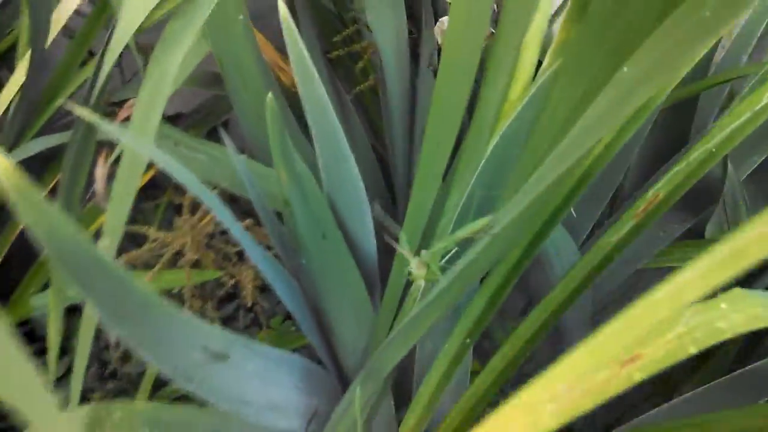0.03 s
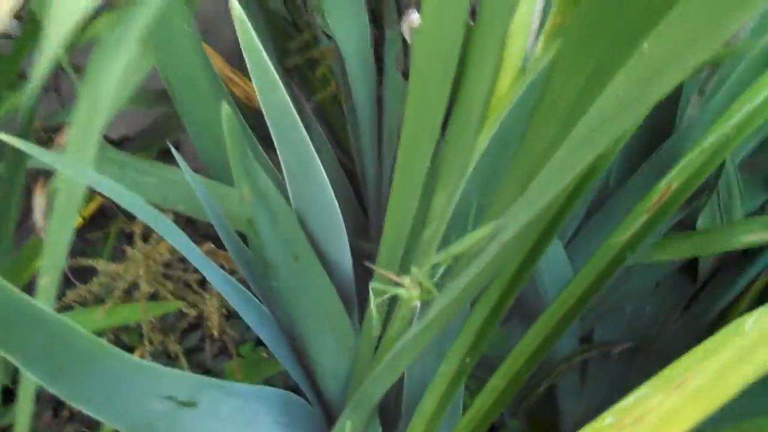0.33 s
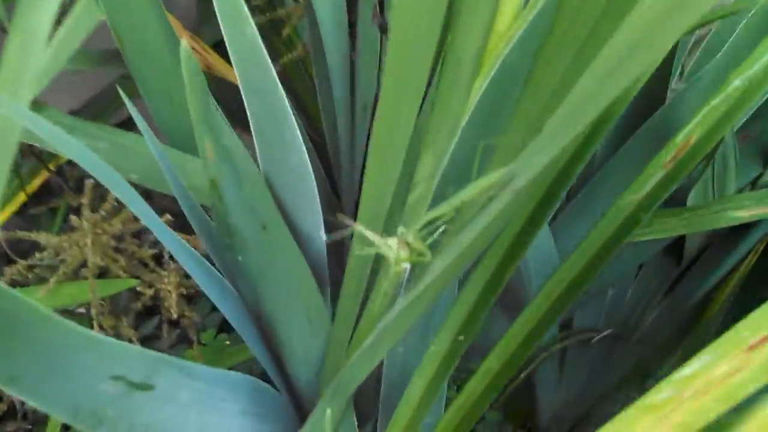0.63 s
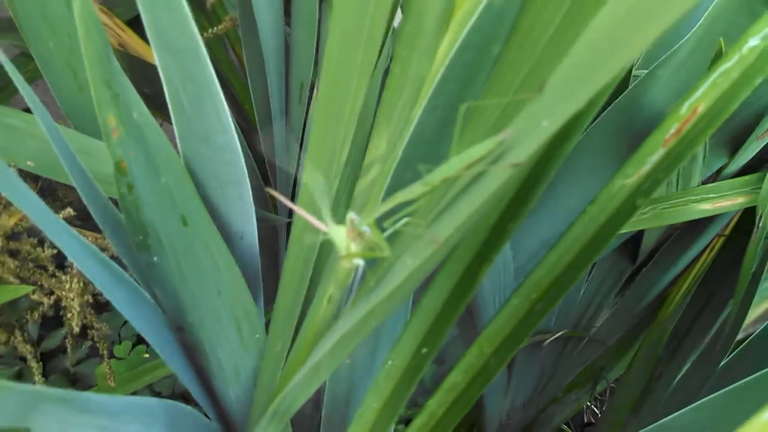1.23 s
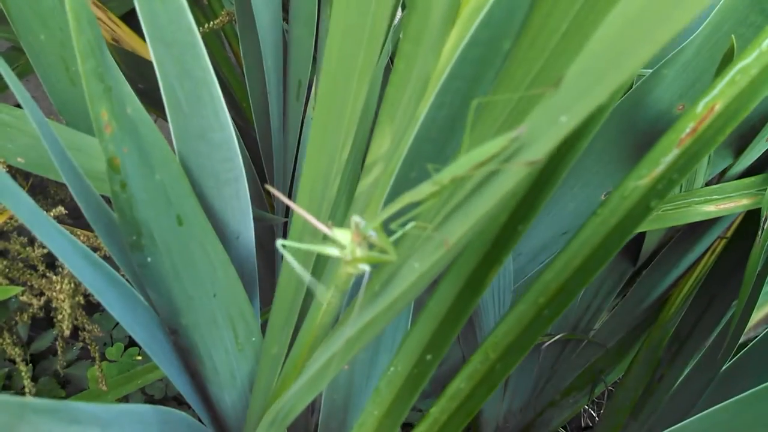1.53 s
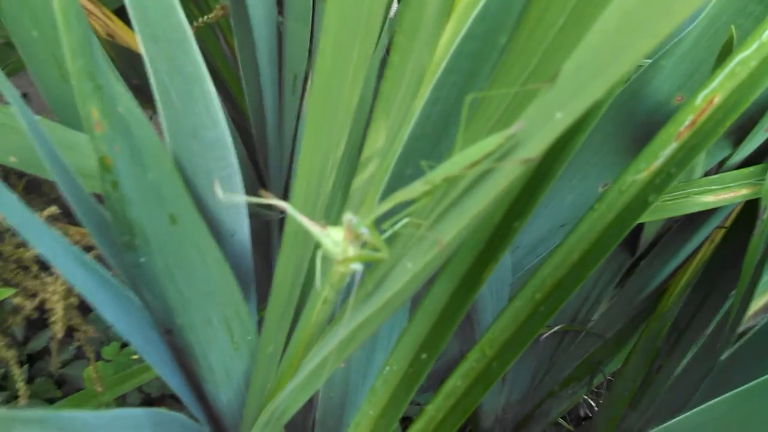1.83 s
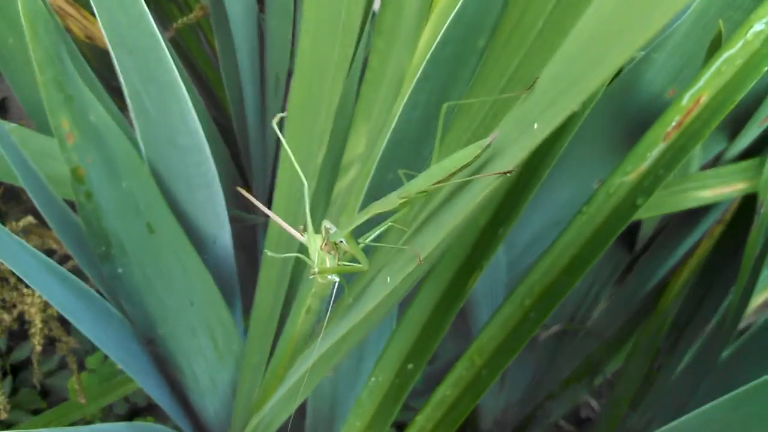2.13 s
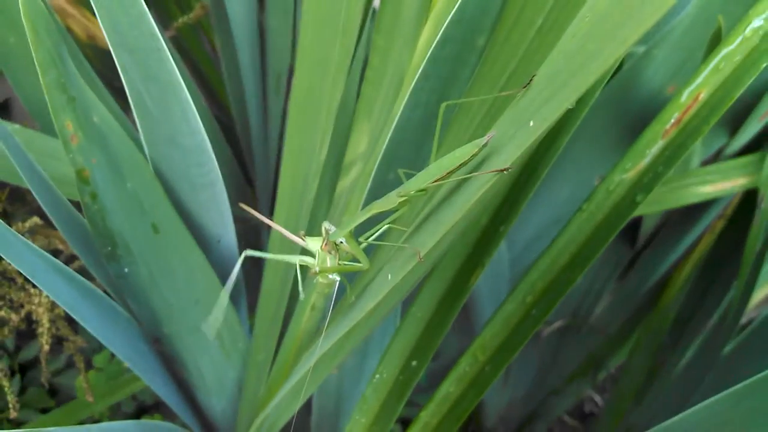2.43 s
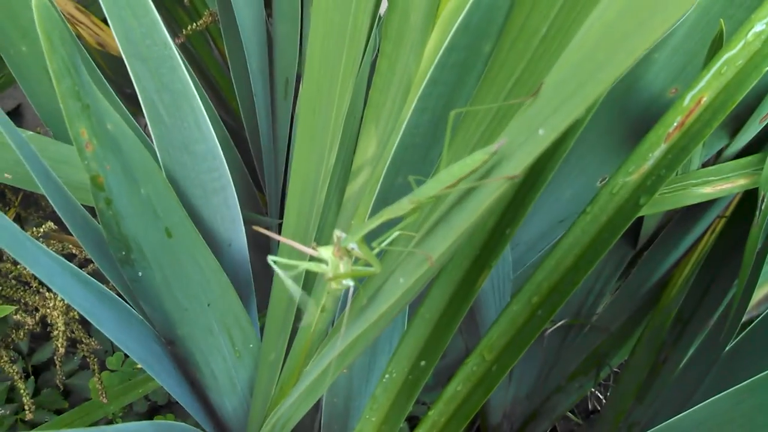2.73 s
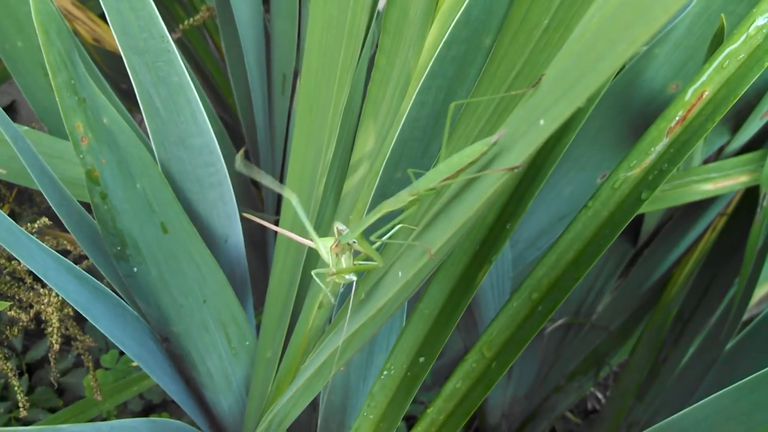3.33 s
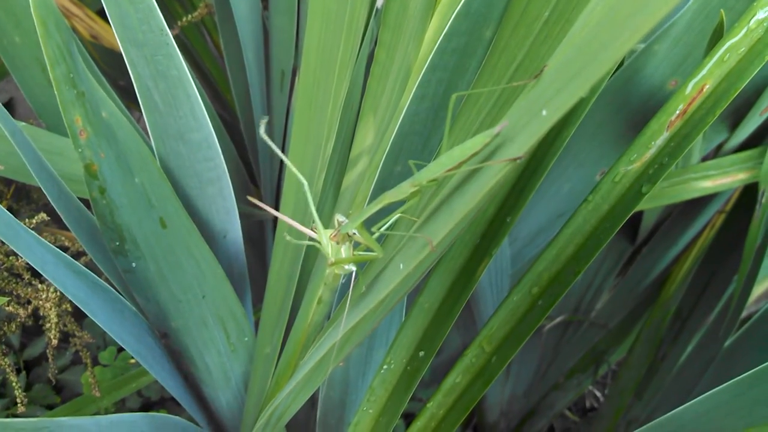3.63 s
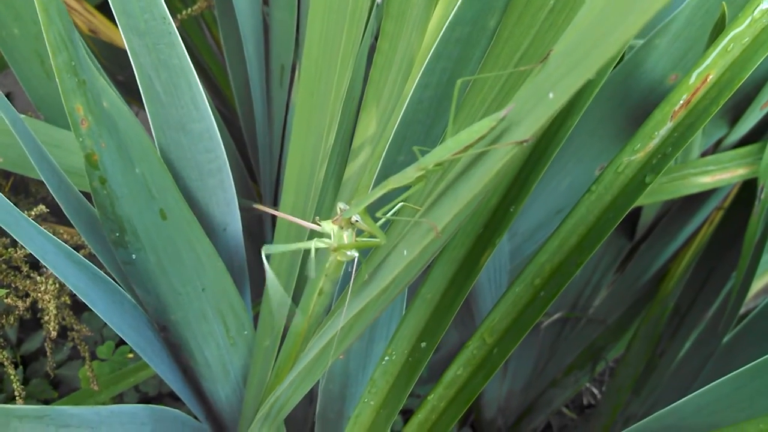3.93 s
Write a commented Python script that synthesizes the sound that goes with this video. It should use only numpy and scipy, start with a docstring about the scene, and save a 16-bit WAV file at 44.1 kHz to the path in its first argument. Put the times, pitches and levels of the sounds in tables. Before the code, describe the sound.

Low, steady outdoor rumble and hiss, broken by fingers rubbing the microphone and dry ticks.

```python
"""A quiet garden, heard from a hand-held recorder close to a leafy plant.
Distant traffic and a machine hum lie under thin bands of far insects and microphone hiss.
Fingers rub over the case twice and bump it once. The handling and the leaves give small ticks
and a few dry snaps, each a tiny knock that rings briefly. Later come four faint, high pips."""
import sys
import numpy as np
from scipy import signal
from scipy.fft import rfft, irfft
from scipy.io import wavfile

SR = 44100
rng = np.random.default_rng(int(sys.argv[2]) if len(sys.argv) > 2 else 0)


def inscribe(sig):
    """Save sig as 16-bit PCM at rate SR to the path in sys.argv[1].

    A 1-D sig is mono; a 2-D sig holds one channel per row.
    Samples are clipped to [-1, 1] before scaling.
    """
    pcm = np.round(np.clip(np.atleast_2d(sig).T, -1, 1) * 32767)
    wavfile.write(sys.argv[1], SR, pcm.astype(np.int16))


N = 176400
T = np.arange(N) / SR   # time of each sample, in seconds
HZ = np.maximum(np.arange(N // 2 + 1) * SR / N, 1)   # frequency of each point in a spectrum


def from_db(db):
    """Turn decibels into a number to multiply by."""
    return 10 ** (np.asarray(db) / 20)


def in_time(rows):
    """Join (seconds, value) points into a curve with a value for every sample."""
    return np.interp(T, *np.transpose(rows))


def at_hz(points):
    """Join (Hz, value) points into a curve with a value for every frequency."""
    hz, value = np.transpose(points)
    return np.interp(np.log(HZ), np.log(hz), value)


def drift(rate_hz):
    """A random wobble of typical size 1, mostly slower than rate_hz."""
    slow = irfft(rfft(rng.standard_normal(N)) / (1 + (HZ / rate_hz) ** 2), N)
    return (slow - slow.mean()) / slow.std()


def arch(start_s, length_s):
    """A smooth rise from 0 to 1 and back."""
    return np.sin(np.pi * np.clip((T - start_s) / length_s, 0, 1)) ** 2


def noise(db_per_hz, likeness=0):
    """Stereo noise; left and right are the same at likeness 1 and opposite at -1."""
    mid, side = rfft(rng.standard_normal((2, N))) * from_db(db_per_hz) * np.sqrt(SR / 4)
    alike = np.clip(likeness, -1, 1)
    return irfft(np.sqrt(1 + alike) * mid + np.sqrt(1 - alike) * side * [[1], [-1]], N)


def resonate(x, hz, width_hz):
    """Make a sound ring at one pitch; a narrower width rings longer."""
    r = np.exp(-np.pi * width_hz / SR)
    feed = np.array([1, 0, -1]) * (1 - r * r) / 2
    feedback = [1, -2 * r * np.cos(2 * np.pi * hz / SR), r * r]
    return signal.lfilter(feed, feedback, x + 1e-18)


def narrow_noise(hz, width_hz):
    """Stereo noise around one pitch, of typical size 1."""
    x = resonate(rng.standard_normal((2, N)), hz, width_hz)
    return x / x.std()


def contacts(rows, modes, decay_s, tail_db, tail_s, near):
    """Tiny knocks: a click, a little grit and a faint tail set a few pitches (the modes) ringing."""
    grit_db, far_mic_db = -19.5, -40   # compared with the click at the nearer microphone
    age = T[:SR // 20]
    click = 1.0 * (age == 0)
    grit_fade = from_db(grit_db) * (np.exp(-age / decay_s) + from_db(tail_db) * np.exp(-age / tail_s))
    mic_gains = from_db([[0 if mic == near else far_mic_db] for mic in ("left", "right")])
    middle_octave = np.mean([np.log2(hz) for hz, _, _ in modes])

    def ring(x, brightness, pitch):
        ringing = 0
        for k, (hz, width, db) in enumerate(modes):
            gain = from_db(db + brightness * (np.log2(hz) - middle_octave))
            ringing += (-1) ** k * gain * resonate(x, hz * pitch, width)
        return ringing

    click_peak = np.abs(ring(click, 0, 1)).max()
    grits = rng.choice([-1, 1], (len(rows), 2, len(age)))
    out = np.zeros((2, N + len(age)))
    for (start_s, db, brightness, pitch), grit in zip(rows, grits):
        start = min(max(int(start_s * SR), 0), N - 1)
        knock = mic_gains * click + grit_fade * grit
        out[:, start:start + len(age)] += from_db(db) / click_peak * ring(knock, brightness, pitch)
    return out[:, :N]


def bright_contacts(rows):
    """High-pitched knocks near the right microphone, no two at quite the same pitch."""
    # The pitches that ring in a tick. Each row: pitch in Hz, width in Hz, level in dB.
    modes = [(4000, 2700, -10), (6700, 1600, -4), (9500, 1100, -3.5), (12700, 900, 7.5), (15100, 2000, -.5)]
    pitches = 1 + .025 * rng.standard_normal(len(rows))
    knocks = [(*row, pitch) for row, pitch in zip(rows, pitches)]
    return contacts(knocks, modes, decay_s=0.00083, tail_db=-13, tail_s=0.016, near="right")


def traffic():
    """Far traffic blends into an even wash of rumble and tyre noise that grows slightly."""
    # The tone of the traffic. Each row: frequency in Hz, level in dB per Hz.
    colour = [(18, -74), (30, -83), (45, -72.5), (60, -63.5), (95, -62), (130, -72), (175, -73.5),
              (260, -74), (380, -79.5), (620, -80.5), (1080, -80), (1500, -84.5), (2300, -87.5),
              (4000, -101), (7000, -120)]
    # How alike left and right are. Each row: frequency in Hz, likeness from -1 to 1.
    likeness = [(40, -0.95), (90, -0.66), (140, -0.041), (200, -0.2), (260, 0.14), (380, 0.074),
                (600, 0.66), (1000, 0.69), (1500, 0.029), (2200, -0.17)]
    # How the traffic grows. Each row: time in seconds, level change in dB.
    growth = [(0, -1), (.8, -1.5), (2, -0.5), (3, 0), (4, 1)]
    wash = noise(at_hz(colour), at_hz(likeness))
    waver_db = 0.57 * drift(rate_hz=7.7)
    return wash * from_db(in_time(growth) + waver_db)


def swells():
    """Soft, low bands of noise rise and sink in the far background."""
    # The swells. Each row: start and length in seconds, pitch and width in Hz, level in dB.
    bands = [(0, 0.56, 208, 52, -50.5), (1.198, 0.86, 98.5, 26, -51.5), (1.69, 0.19, 647, 44, -51),
             (2.3, 1.9, 61, 10, -52.5)]
    return sum(from_db(db) * arch(start_s, length_s) * narrow_noise(hz, width)
               for start_s, length_s, hz, width, db in bands)


def hum():
    """A distant machine hums two wavering tones, stronger on the right."""
    # The machine's tones. Each row: pitch in Hz, average level in dB.
    tones = [(119.5, -55), (240, -62)]
    pan_db, wander_hz, waver_db = 2, 1.21, 2.5
    lowest_hz = tones[0][0]
    wander = 1 + wander_hz / lowest_hz * drift(rate_hz=3.9)
    sound = 0
    for hz, db in tones:
        height = from_db(db + waver_db * drift(rate_hz=9.3)) * np.sqrt(2)
        sound += height * np.sin(2 * np.pi * np.cumsum(hz * wander) / SR)
    return sound * from_db([[-pan_db], [pan_db]])


def insects():
    """Many far insects merge into narrow, steady bands of noise."""
    # The insect chorus. Each row: pitch in Hz, width in Hz, level in dB.
    bands = [(6535, 60, -65), (7005, 40, -71), (7645, 55, -70)]
    return sum(from_db(db) * narrow_noise(hz, width) for hz, width, db in bands)


def hiss():
    """Each microphone makes a faint, steady noise of its own."""
    # The tone of the hiss. Each row: frequency in Hz, level in dB per Hz.
    colour = [(1500, -104), (2700, -99.5), (3250, -94.5), (3900, -101), (4750, -100.5), (5500, -98.5),
              (6100, -96.5), (6700, -95), (7500, -99), (8300, -106), (10500, -109.5), (14000, -104),
              (16000, -104)]
    return noise(at_hz(colour))


def finger_slides():
    """Skin rubs on the case: bright, rough noise, with tiny ticks where it catches."""
    # The strength of the rubbing. Each row: time in seconds, level change in dB.
    strokes = [(0, 0), (.04, -4.5), (.08, -2.5), (.17, 1), (.22, -7.5), (.29, -19), (.9, -21), (.985, -6),
               (1.012, -11), (1.035, -0.5), (1.07, -1), (1.125, 5), (1.165, -1), (1.205, 2.5), (1.24, 1),
               (1.335, 5.5), (1.38, -3), (1.43, -15), (1.6, -17), (1.9, -38), (4, -43)]
    # The tone of the rubbing. Each row: frequency in Hz, level in dB per Hz.
    colour = [(500, -100), (1500, -92), (3200, -92.5), (4500, -96), (5600, -97.5), (8200, -94),
              (11500, -96.5), (14000, -86.5), (16000, -86)]
    rough_db, catches_per_s, catch_offset_db, catch_spread_db = 1.56, 113, -39, 2
    effort_db = in_time(strokes) + rough_db * drift(rate_hz=90)
    caught = rng.random(N) < catches_per_s / SR
    catch_db = effort_db + catch_offset_db + catch_spread_db * rng.standard_normal(N)
    catches = bright_contacts([(start_s, db, 0) for start_s, db in zip(T[caught], catch_db[caught])])
    return noise(at_hz(colour)) * from_db(effort_db) + catches


def ticks():
    """Light touches on the case and leaves give clear ticks, with fainter ones at random."""
    # The clear ticks. Each row: start in seconds, level in dB, brightness in dB per octave.
    clear = [(.074, -35, 0), (.0861, -30, 1), (.2655, -44, 0), (.292, -46, 0), (.3704, -43, 0),
             (.466, -37, 2), (.4728, -35.5, 0), (.6226, -40, 1), (.672, -41, -2), (.732, -44, 1),
             (.8025, -47, 0), (.8287, -41, -1), (.874, -45, 2), (.9317, -21.5, 0), (.9327, -30, -1),
             (1.032, -35, 0), (1.1204, -30, 2), (1.204, -33, 0), (1.386, -32, 1), (1.4056, -27.5, -2),
             (1.4366, -42, 0), (1.4594, -46, 0), (1.7198, -40, 2), (1.7367, -46, 1), (1.805, -39, 1),
             (2.6637, -48, 0), (3.0373, -47, 0), (3.1155, -42, 0), (3.2303, -42, 0), (3.8267, -34.5, -1),
             (3.885, -43, 3)]
    faint_per_s, faint_db = 9, -53
    faint = [(start_s, faint_db, 0) for start_s in T[rng.random(N) < faint_per_s / SR]]
    return bright_contacts(list(clear) + faint)


def snaps():
    """Lower, drier cracks from the handling and leaves; the loudest come in a quick cluster."""
    # The snaps. Each row: start in seconds, level in dB, brightness in dB per octave, pitch ratio.
    cracks = [(.466, -39, 0, 1.15), (.671, -41, 0, 1), (1.0494, -26, 0, 1.15), (1.9525, -33.5, -4, 1),
              (2.0417, -39, 1, 1), (2.0443, -22.5, 1, 1), (2.04533, -19.5, .3, 1), (2.0484, -30, -4, 1)]
    # The pitches that ring in a snap. Each row: pitch in Hz, width in Hz, level in dB.
    modes = [(1440, 660, -3.5), (2360, 500, 3.5), (3260, 400, 7), (4560, 560, -5), (7650, 1200, -9.5),
             (10700, 460, -10), (13800, 3200, -19)]
    return contacts(cracks, modes, decay_s=0.00057, tail_db=-25, tail_s=0.011, near="left")


def bump():
    """A finger bumps the case: a soft thud that sags in pitch and pushes the microphones opposite ways."""
    start_s, rise_s, decay_s, gain_db = .4665, 0.0046, 0.021, -22.5
    start_hz, end_hz, sag_s = 192, 64, 0.0096
    age = np.maximum(T - start_s, 0)
    hz = end_hz + (start_hz - end_hz) * np.exp(-age / sag_s)
    rise_and_fall = (1 - np.exp(-age / rise_s)) * np.exp(-(age / decay_s) ** 2 / 2)
    tone = np.sin(2 * np.pi * np.cumsum(hz * (age > 0)) / SR)
    return from_db(gain_db) * rise_and_fall * tone * [[-1], [1]]


def pips():
    """Short, thin calls swell and fade, perhaps from a far bird."""
    # The calls. Each row: start in seconds, length in seconds, pitch in Hz, level in dB.
    calls = [(2.083, 0.055, 7200, -58), (3.102, .03, 12200, -65), (3.39, .07, 8200, -62),
             (3.55, .03, 7860, -61)]
    return sum(from_db(db) * arch(start_s, length_s) * narrow_noise(hz, width_hz=120)
               for start_s, length_s, hz, db in calls)


def scene():
    """The garden, the hiss and the handling, at the left and right microphones."""
    garden = traffic() + swells() + hum() + insects() + pips()
    return garden + hiss() + finger_slides() + ticks() + snaps() + bump()


def record(dry):
    """The recorder widens the treble, leans slightly to the right and cuts the very highest sound."""
    # The lean. Each row: frequency in Hz, dB added on the right and taken from the left.
    lean_db = [(100, .9), (200, 1.2), (2000, .9), (4000, .55)]
    widen_from_hz, delay_s, cutoff_hz = 1010, 16 / SR, 15550
    mics = rfft(dry)
    # Taking a delayed copy of each side's treble away from the other side widens the sound.
    treble = 1 / (1 + (widen_from_hz / HZ) ** 4)
    delayed_other = np.exp(-2j * np.pi * HZ * delay_s) * mics[::-1]
    wide = (mics - treble * delayed_other) / np.sqrt(1 + treble ** 2)
    lean = from_db(np.array([[-1], [1]]) * at_hz(lean_db))
    top_cut = 1 / np.sqrt(1 + (HZ / cutoff_hz) ** 300)
    return irfft(wide * lean * top_cut, N)


dry = scene()
out = record(dry)
inscribe(out)
```